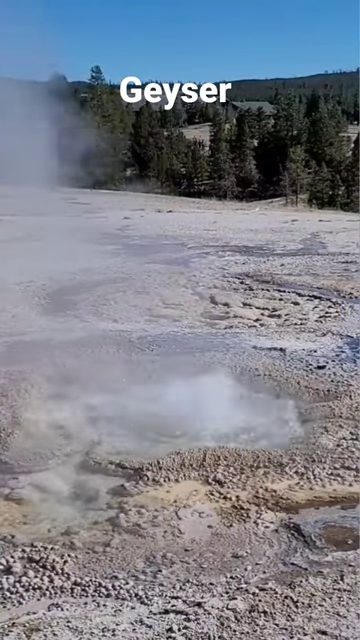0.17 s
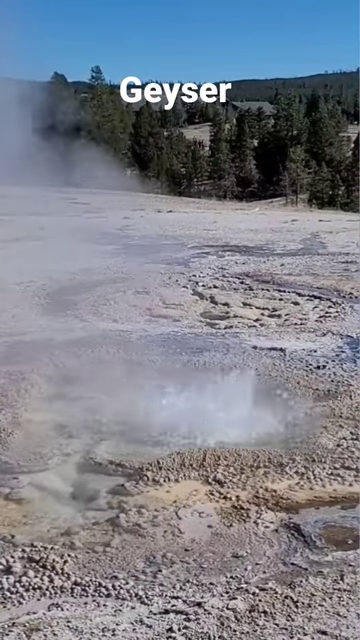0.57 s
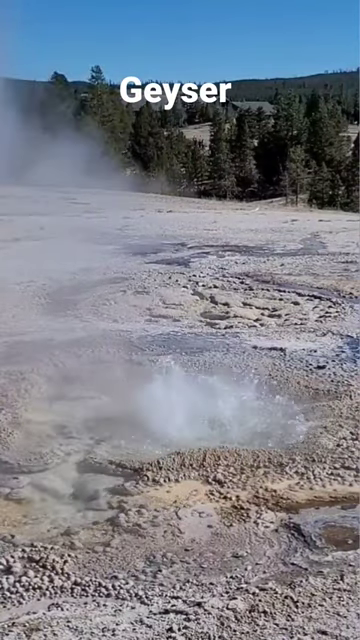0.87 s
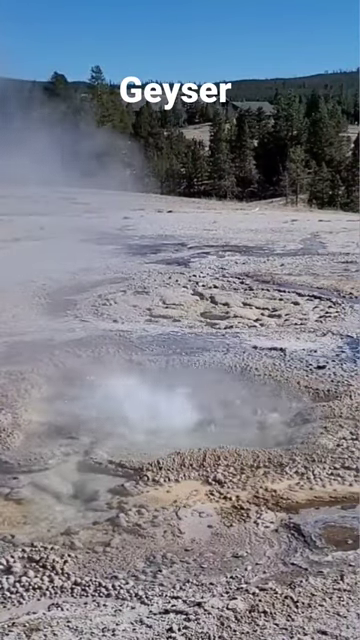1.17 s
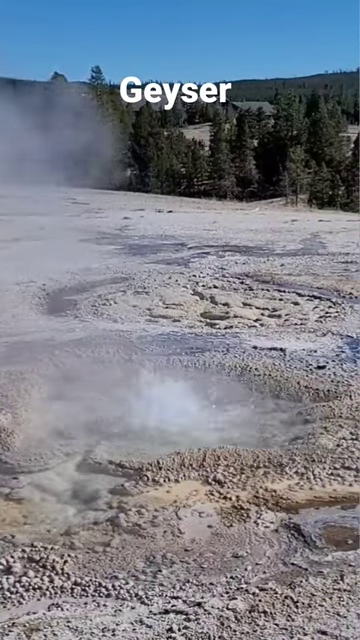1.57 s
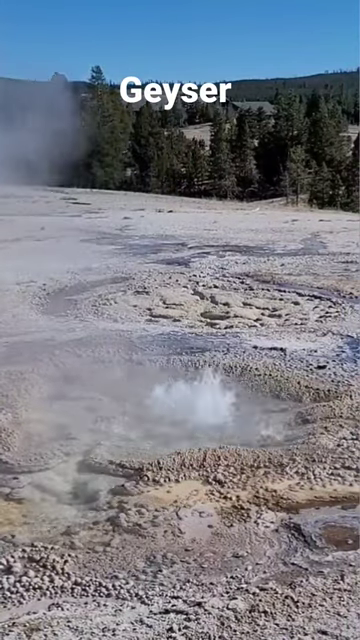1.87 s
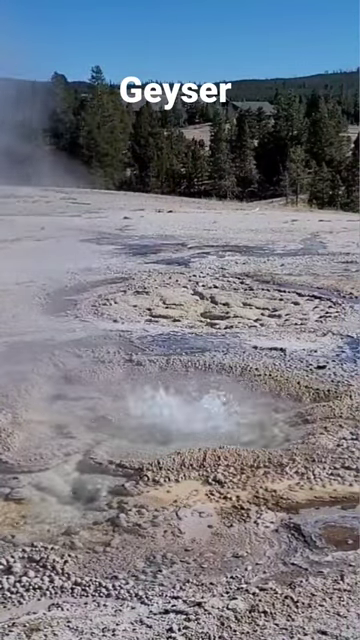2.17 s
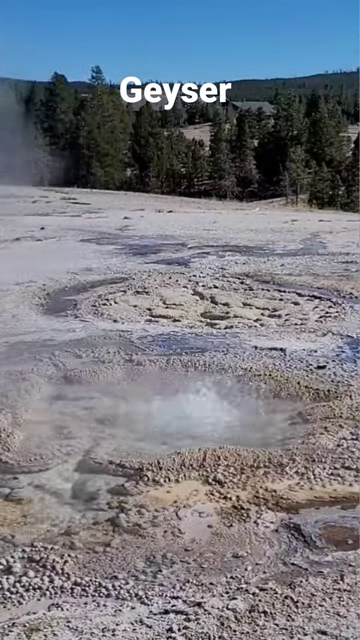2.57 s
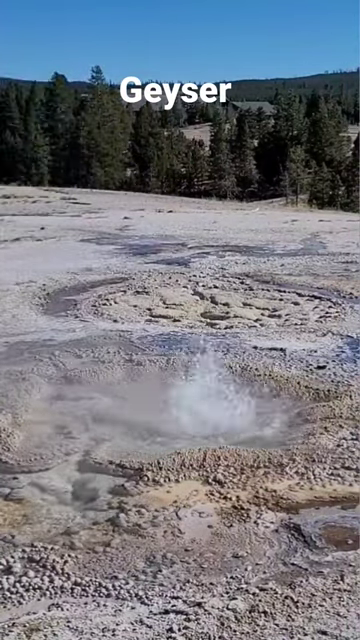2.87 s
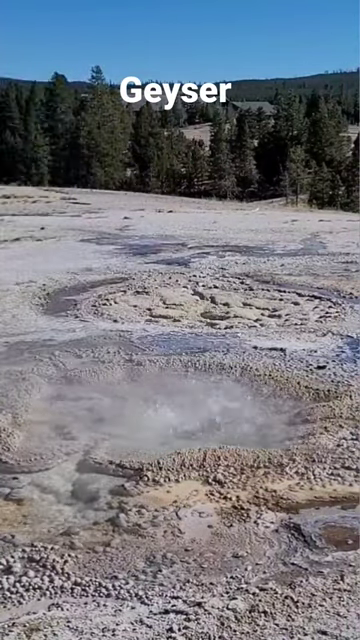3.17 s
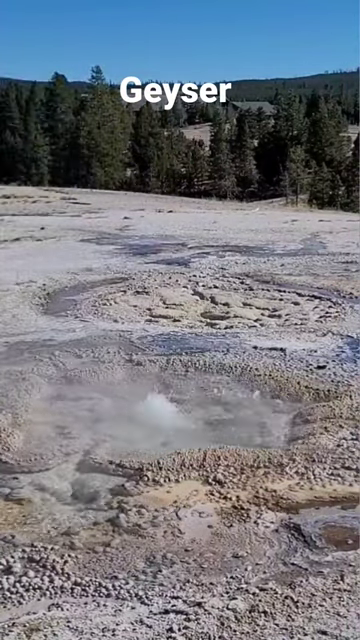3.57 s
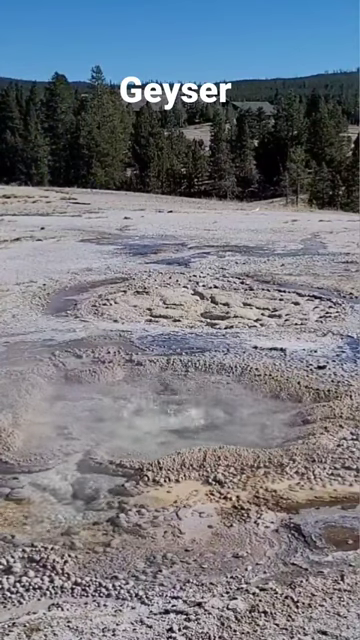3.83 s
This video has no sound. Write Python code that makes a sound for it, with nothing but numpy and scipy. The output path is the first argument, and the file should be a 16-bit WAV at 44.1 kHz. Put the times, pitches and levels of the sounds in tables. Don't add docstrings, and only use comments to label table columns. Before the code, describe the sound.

Small geyser pool churns and splashes in surges, fading, with gusty wind buffeting the microphone

```python
import sys
import numpy as np
from scipy import signal
from scipy.fft import rfft, irfft
from scipy.io import wavfile

SR = 44100
rng = np.random.default_rng(int(sys.argv[2]) if len(sys.argv) > 2 else 0)


def file_out(sig):
    cols = np.atleast_2d(sig).T
    lim = np.clip(cols, -1, 1)
    pcm = np.round(lim * 32767).astype(np.int16)
    wavfile.write(sys.argv[1], SR, pcm)


def volts_from_decibels(level):
    exponent = np.asarray(level, float) / 20
    return 10 ** exponent


N = 176400
SIDES = np.array([[1], [-1]])


def rms_one(x):
    return x / np.sqrt(np.mean(x ** 2) + 1e-20)


def filtered(x, order, hz, kind):
    return signal.sosfilt(signal.butter(order, hz, kind, fs=SR, output="sos"), x)


def in_time(rows):
    s, *columns = np.transpose(rows)
    return [np.interp(np.arange(N) / SR, s, column) for column in columns]


def swells(rows):
    t = np.arange(N) / SR
    return sum(db * np.exp(-((t - s) / width) ** 2) for s, db, width in rows)


def at_hz(points, hz):
    point_hz, values = np.transpose(points)
    return np.interp(np.log(hz), np.log(point_hz), values)


def drift(rate_hz):
    r = np.exp(-80 * np.pi * rate_hz / SR)
    noise = rng.standard_normal(N // 40 + 2002)
    slow = signal.lfilter([1], [1, -2 * r, r * r], noise)[2000:]
    return np.interp(np.arange(N) / 40, np.arange(len(slow)), rms_one(slow))


def ring(clicks, hz, t60):
    r, w = 1000. ** (-1 / (t60 * SR)), 2 * np.pi * hz / SR
    return signal.lfilter([0, np.sin(w)], [1, -2 * r * np.cos(w), r * r], clicks + 1e-18)


def coloured(x, spectrum):
    length = x.shape[-1]
    hz = np.maximum(np.fft.rfftfreq(length, 1 / SR), 1)
    return irfft(rfft(x) * volts_from_decibels(at_hz(spectrum, hz)), length)


def add(out, s, x):
    i = int(s * SR)
    x, i = x[..., max(-i, 0):], max(i, 0)
    out[..., i:i + x.shape[-1]] += x[..., :N - i]


def spread(mid, side):
    # pitch_hz, likeness (1 = the same)
    likeness = [(60, 0.46), (130, 1), (290, 0.33), (640, 0.69), (1410, 0.91), (3100, 0.85), (6810, -0.03),
                (15000, -0.094)]
    # pitch_hz, left_over_right_db
    lean = [(60, 0.66), (950, 0.069), (15000, 1.8)]
    hz = np.maximum(np.fft.rfftfreq(N, 1 / SR), 1)
    alike = np.clip(at_hz(likeness, hz), -.95, .95)
    both = np.sqrt(1 + alike) * rfft(mid) + SIDES * np.sqrt(1 - alike) * rfft(side)
    return irfft(both * volts_from_decibels(SIDES * at_hz(lean, hz) / 2), N) / np.sqrt(2)


def patchy(spectrum, together_db, own_db, rate_hz):
    together = drift(rate_hz) + 0.38 * drift(70)
    white = rng.standard_normal((2, 2, N))
    low_end, high_end = spectrum[0][0], spectrum[-1][0]
    octaves = np.arange(0, np.log2(high_end / low_end) + .6, .5)
    edges = np.minimum(low_end * 2 ** octaves, .45 * SR)
    out = 0
    for k, (low, high) in enumerate(zip(edges, edges[1:])):
        band = filtered(white[k % 2], 2, [low, high], "band")
        out = out + band * volts_from_decibels(together_db * together + own_db * drift(21.0))
    return rms_one(spread(*coloured(out, spectrum)))


def grains(per_s, low_hz, high_hz, cycles, size_db):
    sizes = volts_from_decibels(size_db * np.minimum(rng.exponential(1, (2, N)), 4)) * rng.choice([-1, 1], (2, N))
    born = rng.random(N) < per_s / SR
    dealt = rng.integers(0, 16, N)
    sizes[1] = sizes[0] * np.sign(sizes[1])
    rings = 0
    for k, hz in enumerate(np.geomspace(low_hz, high_hz, 16)):
        rings = rings + ring(sizes * (born & (dealt == k)), hz, cycles / hz)
    return rms_one(spread(*rings))


def steam():
    hiss = filtered(rng.standard_normal((2, N)), 2, 8400, "high")
    return volts_from_decibels(-76.5) * rms_one(hiss)


def steady_wind():
    # start_s, left_db, right_db
    wind_levels = [(0, -37.5, -40), (.3, -35, -30.5), (.5, -44.5, -48), (.58, -38.5, -68),
                   (.66, -57, -35.5), (.8, -44, -46), (.92, -37.5, -86), (1.2, -38, -27), (1.43, -43, -44),
                   (1.58, -53, -39.5), (1.67, -47.5, -77), (1.85, -38.5, -85), (2.1, -46.5, -78),
                   (2.3, -46.5, -45), (2.65, -54, -66.5), (3.1, -68, -85), (3.6, -76, -69), (4, -68, -92)]
    # pitch_hz, level_db
    wind_colour = [(12, -74), (20, -8), (70, 3), (198, -9), (325, -22.5), (665, -44.5), (900, -55),
                   (1170, -79), (1980, -120)]
    lumps_per_s, lump_db, wind_db = 14, 3.5, 6.5
    lumps = np.array([drift(lumps_per_s), drift(lumps_per_s)])
    noise = rng.standard_normal((2, N)) * volts_from_decibels(lump_db * lumps)
    return rms_one(coloured(noise, wind_colour)) * volts_from_decibels(np.array(in_time(wind_levels)) + wind_db)


def buffets():
    # crest_s, left_db, right_db, throb_hz, right_port_lag_ms
    eddies = [(0.097, -16.5, -19.5, 87, -4), (0.148, -16.5, -35, 155, 1), (0.206, -11, -14.5, 76, -6),
              (0.244, -11.5, -18, 64, -7.5), (0.298, -20, -17.5, 84, 4.5), (0.351, -21, -16, 65, 6),
              (0.393, -14.5, -20.5, 79, 2), (0.426, -21.5, -23.5, 76, -5.0), (0.475, -30, -36, 67, 5),
              (0.511, -30.5, -29, 67, 3.5), (0.677, -52, -29, 72.6, 14), (0.738, -34, -29, 91, -1.5),
              (0.801, -35, -28.5, 143, 0), (0.827, -24, -27.5, 67, -4.5), (0.852, -34, -44, 62.3, 10),
              (0.873, -31, -53, 75, -3), (0.989, -11.5, -17, 68, -8), (1.068, -17.5, -16, 67.5, 0.5),
              (1.137, -21, -43, 72.5, 3), (1.17, -19, -23, 108, 3.5), (1.198, -15, -18, 118, -9),
              (1.22, -15, -9.5, 64, 4.2), (1.252, -17.5, -25, 59, -9), (1.305, -15.5, -15.5, 77, 1),
              (1.384, -19.5, -40, 69, 4), (1.479, -24.5, -22.5, 68.6, -5), (1.522, -29.5, -25, 122, -3.5),
              (1.545, -29.5, -34, 78, -3.5), (1.583, -27.5, -30.5, 66.4, -2), (1.711, -29.5, -62, 65.4, -4),
              (1.782, -30.5, -62, 57, 3.6), (1.819, -30.5, -62, 65, -5), (1.894, -32, -52, 64.5, -5.5),
              (2.149, -27.5, -55, 66.6, -2.5), (2.202, -23, -26.5, 72.4, 1.7), (2.235, -33, -33, 83, 9.5),
              (2.354, -45, -35, 146, -1.5), (2.378, -41, -37, 58, -4), (2.52, -31, -34, 99, 2.6),
              (2.809, -31.5, -34, 166, -0.3)]
    # crest_s, left_db, right_db, throb_hz, right_port_lag_ms
    last_eddies = [
        (2.985, -44.5, -51, 58, -3),
        (3.261, -47, -49, 56, 0),
        (3.586, -44, -57, 68, 5),
        (3.746, -50, -51, 62.6, -1),
    ]
    buffet_db, rattle_db = -0.28, -10.5
    length_cycles, sag = 2.51, 0.28
    tail = 1.64
    out, t = np.zeros((2, N)), np.arange(-2048, 4096) / SR
    rattle = rms_one(filtered(rng.standard_normal((2, N + SR)), 4, (110, 340), "band"))
    eddies = eddies + last_eddies
    starts = rng.uniform(0, 2 * np.pi, len(eddies))
    for (s, left_db, right_db, hz, lag_ms), start in zip(eddies, starts):
        cycle = (t + SIDES * lag_ms / 2000) * hz
        swing = t * hz / length_cycles / np.where(t > 0, tail, 1)
        shape = np.cos(np.pi * np.clip(swing, -.5, .5)) ** 2
        throb = np.sin(2 * np.pi * cycle * (1 - sag * cycle / 2) + start)
        throb = throb + volts_from_decibels(rattle_db) * rattle[:, int(s * SR):][:, :len(t)]
        level = volts_from_decibels(buffet_db + np.array([[left_db], [right_db]]))
        add(out, s + t[0], shape * throb * level)
    return out


def slaps(out):
    # start_s, peak_db, pitch_hz
    slap_events = [(0.054, -40.5, 3420), (0.211, -36.5, 1390), (0.308, -46, 7800), (0.656, -43, 900),
                   (0.689, -57, 2330), (0.812, -40, 1390), (1.325, -46, 1050.0), (1.369, -44, 700.0),
                   (1.492, -44, 2680.0), (1.512, -43, 4560), (1.595, -38, 2060), (1.662, -43, 910),
                   (1.702, -38.5, 3850), (1.757, -43, 930), (1.786, -33.5, 2050.0), (1.833, -38.5, 2070),
                   (1.965, -44.5, 7700), (2.04, -44, 710), (2.193, -46.5, 3020), (2.255, -46, 1050.0),
                   (2.321, -46.5, 1790.0), (2.371, -36, 680), (2.38, -41, 1540), (2.614, -56, 2040),
                   (2.623, -49, 1580), (2.686, -48, 3350), (2.72, -53.5, 2050.0), (2.798, -39.5, 700.0),
                   (2.866, -46, 920.0), (2.905, -48, 1370.0), (2.976, -47.5, 1200.0), (3.116, -52, 2050.0),
                   (3.169, -48.5, 9000.0), (3.221, -41, 1720), (3.237, -49, 3510.0), (3.401, -45.5, 2650),
                   (3.426, -47.5, 4570), (3.54, -54, 1050.0), (3.604, -56, 920.0), (3.621, -51.5, 1180),
                   (3.704, -65, 1740), (3.827, -60, 1370.0), (3.852, -54.5, 1000), (3.908, -52.5, 2350.0)]
    slap_db, t60_s, width = 1.5, 0.025, 0.33
    t = np.arange(4096) / SR
    shape = 1000. ** (-t / t60_s) * (1 - np.exp(-t / 0.00068))
    for s, db, hz in slap_events:
        edges = [hz / (1 + width), min(hz * (1 + width), .45 * SR)]
        crack = filtered(rng.standard_normal((2, 4096)) * shape, 2, edges, "band")
        add(out, s, volts_from_decibels(db + slap_db) * crack / np.abs(crack).max())


def plops(out):
    # start_s, peak_db, pitch_hz
    plop_events = [
        (1.653, -36.5, 440),
        (2.129, -29.5, 293),
        (2.3, -28.5, 186),
        (2.8, -30.5, 173),
        (3.057, -35.5, 381),
        (3.579, -38, 340),
    ]
    plop_db, fade_cycles, rise = -4, 7.8, 0.16
    t = np.arange(4096) / SR
    for s, db, hz in plop_events:
        cycle = t * hz
        shape = 1000. ** (-cycle / fade_cycles) * (1 - np.exp(-cycle / 0.79))
        plop = np.sin(2 * np.pi * cycle * (1 + rise * cycle / 10)) * shape
        add(out, s, volts_from_decibels(db + plop_db) * plop / np.abs(plop).max() * [[1], [.4]])


def drops():
    out = np.zeros((2, N))
    slaps(out)
    plops(out)
    return spread(*out) * 1.35


def gurgle():
    # start_s, level_db
    gurgle_levels = [(0, -42.5), (.45, -59), (.57, -49.5), (.72, -47), (1.15, -45), (1.7, -47.5),
                     (1.95, -53.5), (2.5, -50), (2.73, -59), (3.1, -53), (3.5, -57.5), (3.67, -63),
                     (4, -67)]
    # crest_s, rise_db, width_s
    heaves = [(.19, 15, 0.076), (.38, 21.5, 0.056), (1.01, 14, 0.012), (1.14, 16.5, 0.013),
              (1.66, 9, 0.0097), (2.05, 16, 0.031), (2.14, -8, 0.011), (2.34, 19, 0.027),
              (2.385, 14, 0.025), (2.81, 16.5, 0.056), (2.89, 5.5, 0.03), (3.23, 9, 0.014),
              (3.36, -14, 0.016), (3.5, 11, 0.027), (3.75, 10, 0.041), (3.92, 10, 0.033)]
    per_s = 500 * volts_from_decibels(3.2 * drift(17))
    bubbles = grains(per_s, 254, 635, cycles=12.3, size_db=4.5)
    bubbles = filtered(bubbles, 2, 674, "low")
    level_db, = in_time(gurgle_levels)
    return volts_from_decibels(level_db + swells(heaves)) * bubbles


def boil():
    # start_s, churn_db, spray_brightness_db
    vigour = [(0, -50, -4.5), (.42, -46, -11), (.57, -64.5, -1), (.7, -52, -6), (.9, -49.5, -7.5),
              (1.05, -54.5, -4), (1.35, -53, -7), (1.55, -52, -5), (1.9, -55, -3), (2.15, -53.5, -10.5),
              (2.5, -56.5, -6.5), (2.74, -60.5, -6.5), (3.0, -57.5, -5.5), (3.1, -65, -3),
              (3.53, -63.5, -3.5), (3.65, -70, -12.5), (3.8, -70.5, -12.5), (4, -74, -2.5)]
    # crest_s, rise_db, width_s
    surges = [(.26, 6, 0.05), (.73, 6, 0.079), (1.6, 3, 0.029), (1.8, 5.5, 0.071), (2.04, 1, 0.031),
              (2.261, 9.5, 0.012), (2.387, 8.5, 0.019), (2.459, 9, 0.068), (2.811, 8, 0.026),
              (2.882, 13, 0.056), (3.222, 10.5, 0.12), (3.4, 9.5, 0.044), (3.92, 14, 0.074)]
    # pitch_hz, level_db
    churn_colour = [(350, 1.5), (600, 5), (700, -0.5), (850, 4), (1400, -3), (2200, -5), (2900, -10),
                    (4000, -30.5), (8000, -53)]
    # pitch_hz, level_db
    spray_colour = [(1760, 3), (3000, -2), (6330, -6), (7520, -5.5), (8560, -10.5), (11700, -8),
                    (15400, -12.5)]
    churn_db, fizz_db, spray_db, crackle_db = -1.2, -6, 4.5, -5
    churn = volts_from_decibels(churn_db) * patchy(churn_colour, together_db=1.36, own_db=3.5, rate_hz=9.0)
    fizz_per_s = 700 * volts_from_decibels(4.0 * drift(30))
    fizz = volts_from_decibels(fizz_db) * grains(fizz_per_s, 827, 2400, cycles=5.8, size_db=5.0)
    spray = volts_from_decibels(spray_db) * patchy(spray_colour, together_db=0.98, own_db=1.9, rate_hz=87.0)
    crackle_per_s = 230 * volts_from_decibels(4.6 * drift(30))
    crackle = volts_from_decibels(crackle_db) * grains(crackle_per_s, 3160, 15700, cycles=16.0, size_db=5.5)
    level_db, bright_db = in_time(vigour)
    surge_db = swells(surges)
    fine = volts_from_decibels(bright_db - 0.5 * surge_db) * (spray + crackle)
    return volts_from_decibels(level_db + surge_db) * (churn + fizz + fine)


def scene():
    return steam() + steady_wind() + buffets() + drops() + gurgle() + boil()


def band_limit(x):
    return signal.sosfilt(signal.butter(12, 15590, fs=SR, output="sos"), x)


def record(dry):
    limit, cutoff_hz = .36, 15500
    rounded = limit * np.tanh(dry / limit)
    top_cut = signal.cheby2(10, 50, cutoff_hz * 1.05, fs=SR, output="sos")
    return band_limit(signal.sosfilt(top_cut, rounded))


dry = scene()
out = record(dry)
file_out(out)
```